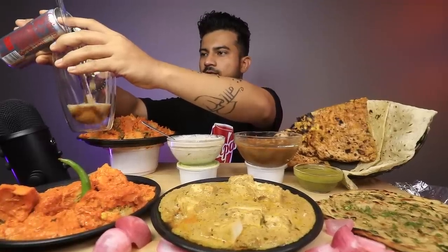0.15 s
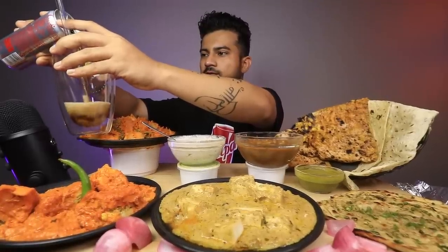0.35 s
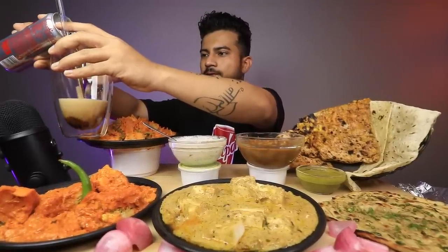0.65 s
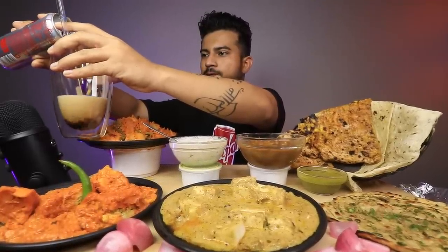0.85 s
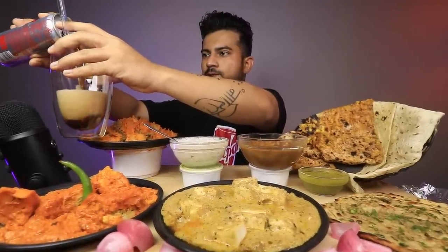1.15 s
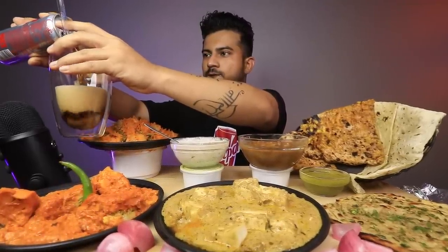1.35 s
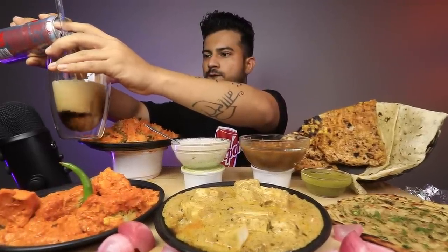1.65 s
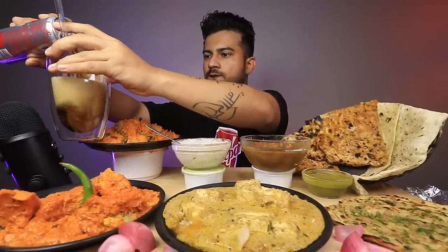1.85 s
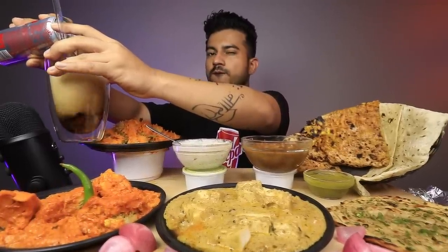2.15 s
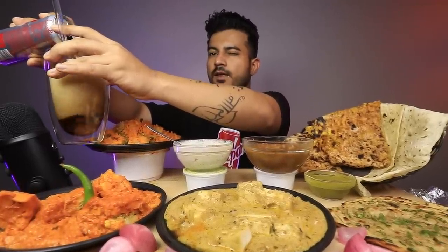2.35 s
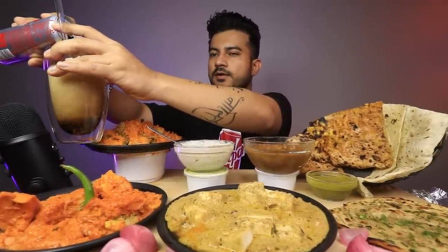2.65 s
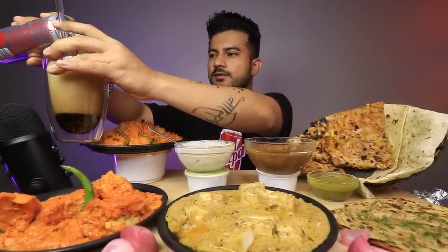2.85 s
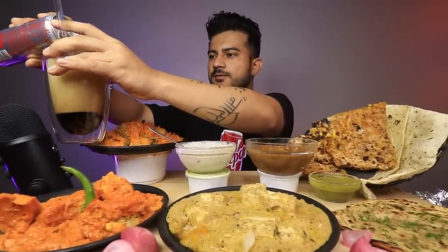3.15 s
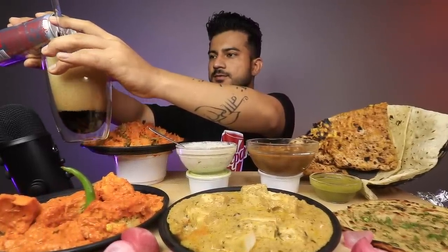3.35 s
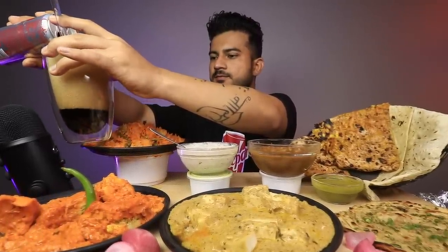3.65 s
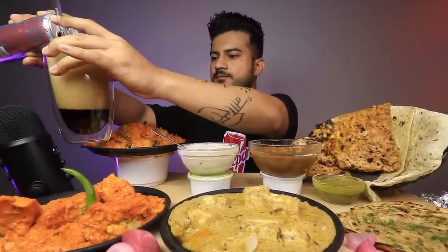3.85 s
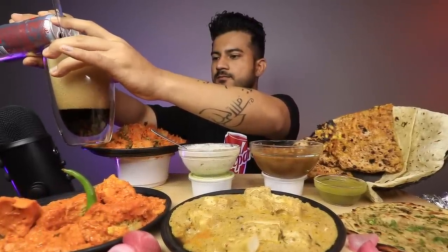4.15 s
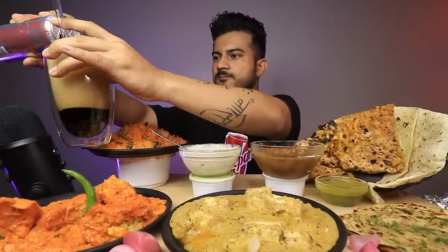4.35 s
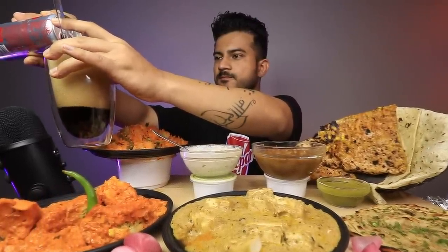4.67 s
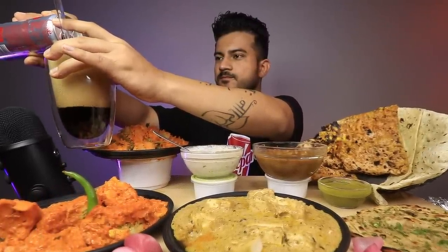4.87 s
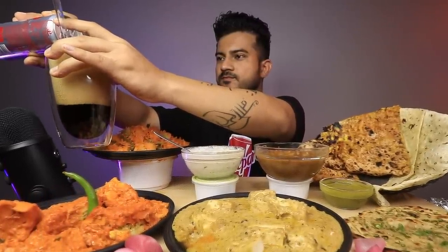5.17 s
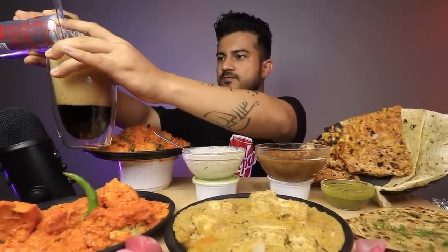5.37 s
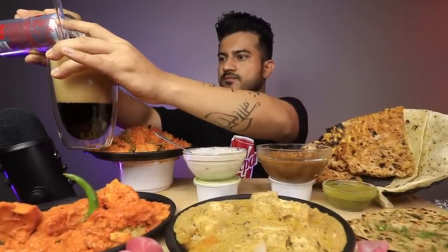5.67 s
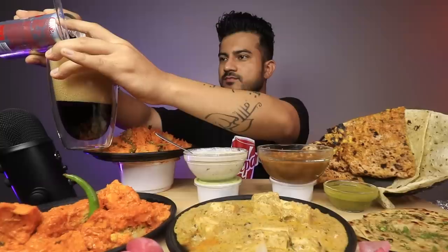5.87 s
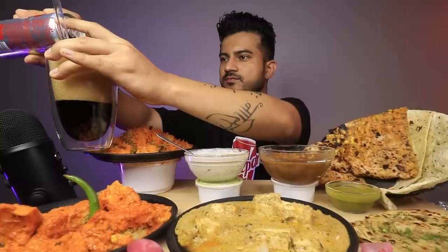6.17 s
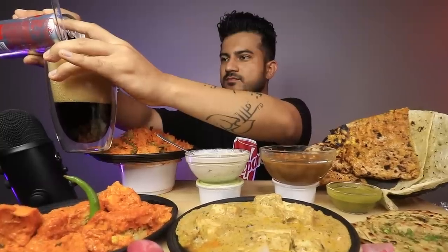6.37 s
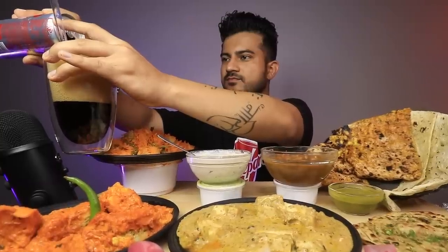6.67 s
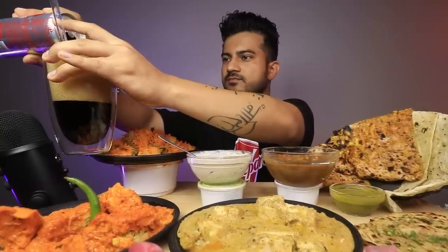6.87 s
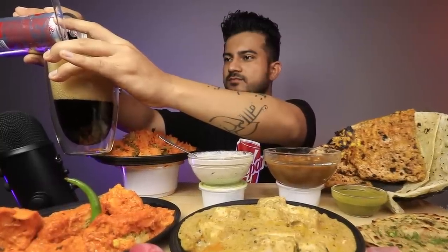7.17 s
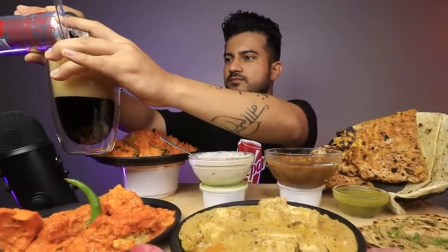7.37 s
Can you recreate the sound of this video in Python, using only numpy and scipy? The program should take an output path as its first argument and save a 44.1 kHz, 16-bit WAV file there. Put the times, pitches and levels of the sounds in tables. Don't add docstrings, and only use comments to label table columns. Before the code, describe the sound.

Soda splashes into an empty tall glass with hollow, low ringing glugs, then turns into a dense, steady fizz. Early on the thin can buckles with a sharp metallic crackle, then creases more softly. The airy tone within the hiss rises as the glass fills. Midway come small ticks and a low table bump; later a finger squeaks briefly on the can. Close microphone, indoor room, faint rumble.

```python
import sys
import numpy as np
from scipy import signal
from scipy.fft import rfft, irfft, next_fast_len
from scipy.io import wavfile
from scipy.ndimage import uniform_filter1d, map_coordinates

SR = 44100
rng = np.random.default_rng(int(sys.argv[2]) if len(sys.argv) > 2 else 0)


def transcribe(u):
    v = np.clip(np.atleast_2d(u).T, -1, 1)
    q = np.round(v * 32767).astype(np.int16)
    wavfile.write(sys.argv[1], SR, q)


def undo_db(level):
    steps = np.asarray(level, float) / 20
    return 10 ** steps


N = 331781
T = np.arange(N) / SR


def unit(x):
    return x / np.sqrt(np.mean(np.abs(x) ** 2) + 1e-20)


def along(points, hz):
    point_hz, value = np.transpose(points)
    return np.interp(np.log(hz + 1), np.log(point_hz + 1), value)


def wobble(knots_per_s):
    knots = rng.standard_normal(int(N * knots_per_s / SR) + 4)
    return map_coordinates(knots, [T * knots_per_s])


def bell(t, middle_s, takes_s):
    return np.exp(-((t - middle_s) / takes_s) ** 2)


def swells(rows):
    return sum(db * bell(T, middle_s, half_s) for middle_s, half_s, db in rows)


def peak(f, hz, width_hz):
    damping = 1j * f * width_hz
    return damping / (hz * hz - f * f + damping)


def filtered(x, response):
    m = next_fast_len(N + SR // 2)
    return irfft(rfft(x, m) * response(np.fft.rfftfreq(m, 1 / SR)), m)[:N]


def add(out, start_s, sound):
    part = out[round(start_s * SR):][:len(sound)]
    part += sound[:len(part)]


BUBBLE_HZ = [2500, 4500, 7500, 12500]


def bubbles():
    hiss = rng.standard_normal(N)
    for hz in BUBBLE_HZ:
        happens = rng.random(N) < 1500 / SR
        bursts = happens * rng.standard_normal(N) * undo_db(1.4 * rng.exponential(size=N))
        hiss = hiss + filtered(0.72 * unit(bursts), lambda f: peak(f, hz, 0.74 * hz))
    return hiss


# time_s, fizz_db, column_hz, column_over_fizz_db
POUR = [(0, -48, 686, 23.5), (.3, -45.5, 676, 15), (.6, -43, 740, 1.5), (1, -44, 825, 6),
        (1.5, -42.5, 970, 7.5), (2, -42.5, 1220, 8), (2.35, -41.5, 1340, 6.5), (2.7, -42.5, 1370, 9.5),
        (3.5, -42.5, 1390, 6.5), (4.5, -42, 1380, 4.5), (5.5, -41.5, 1430, 3), (6.7, -41, 1420, 3),
        (7.52, -42.5, 1400, 5)]
# pitch_hz, density_db_per_hz
THIN = [(150, -14), (400, -10.5), (1000, 2), (1900, -9), (3200, -7), (4400, -10), (6200, -6.5), (7800, -6),
        (9000, -12), (11000, -17), (13200, -16), (15500, -24)]
DEEP = [(150, -23.5), (400, -5), (1000, 0.5), (1900, -9), (3200, -3.5), (4400, -7), (6500, -4.5),
        (7800, -7.5), (9000, -12.5), (11000, -14), (13200, -18), (15500, -21)]
# pitch_hz, width_hz, level_db
THIN_HOLLOWS = [(2350, 150, -4), (2780, 300, 4.5), (3650, 180, -1)]
DEEP_HOLLOWS = [(547, 57, 2.5), (1927, 143, 2.5), (2344, 380, 1), (2610, 370, -3.5)]


def foam_surface(f, t, depth):
    lean, lift = bell(t, 1.8, .35), bell(t, 2.62, .33)
    lifted = lift - lean
    tired_s = np.clip(t - 4.8, 0, None)
    sparkle_db = 3.5 - 8 * bell(t, 0, 0.46) + 2 * lean + 0.5 * lift - 2 * tired_s
    body_db = (1 - depth) * along(THIN, f) + depth * along(DEEP, f)
    surface = undo_db(body_db + sparkle_db * np.abs(peak(f, 15200, 5100)))

    def bump_at(hz, width_hz):
        return np.abs(peak(f, hz, width_hz)) ** 2

    crest_db = 1.47 * bump_at(6200 + 1300 * lift, 4200)
    edge_db = (0.8 + 1.5 * lifted) * bump_at(9300 + 600 * lift, 2700)
    notch_db = (5.1 + 2 * lifted) * bump_at(11260 + 550 * lifted, 1640)
    return surface * undo_db(crest_db + edge_db - notch_db)


def foam():
    source = unit(bubbles()) * undo_db(.35 * wobble(9) + .5 * wobble(60))
    f, t, z = signal.stft(source, SR, nperseg=1024, noverlap=768)
    f = f[:, None] + 1
    time_s, *cols = np.transpose(POUR)
    fizz_db, column_hz, column_db = (np.interp(t, time_s, c) for c in cols)
    froth = np.exp(-t / 0.54)
    head = 0.97 / (1 + np.exp((2.6 - t) / 0.55))
    depth = np.clip(froth + head, 0, 1)
    core = np.abs(peak(f, column_hz, 100 + 0.13 * np.abs(column_hz - 720))) ** 4
    skirt = np.abs(peak(f, column_hz, .5 * column_hz)) ** 4
    column = core + undo_db(0.5) * skirt * np.clip(t / 1.3, 0, 1)
    power = foam_surface(f, t, depth) ** 2 + undo_db(column_db - 2) ** 2 * column
    for hollows, share in ((THIN_HOLLOWS, 1 - depth), (DEEP_HOLLOWS, depth)):
        power = power + share * sum(undo_db(db) ** 2 * np.abs(peak(f, hz, w)) ** 4 for hz, w, db in hollows)
    patches = uniform_filter1d(rng.standard_normal(z.shape), size=14, axis=0)
    patches = uniform_filter1d(patches, size=9, axis=1)
    z = z * np.sqrt(power) * undo_db(fizz_db + 6.5 + 0.14 * unit(patches))
    return signal.istft(z, SR, nperseg=1024, noverlap=768)[1][:N]


# start_s, peak_db, thud_over_ring_db
SPLASH = [(0, -11.5, -5), (0.0165, -23.5, -6), (.0235, -24.5, -12), (.029, -31, 4), (.0495, -33, 4),
          (.073, -36, -3), (.0905, -31, -6), (.0995, -28, -9), (.1325, -13.5, -4), (0.1557, -24.5, -4),
          (.159, -28, -2), (.1728, -30, 7), (0.1885, -25, 5), (.2175, -35, -5), (.2228, -18, 5),
          (.2375, -24.5, 4), (.2435, -29, -10), (0.2695, -28.5, 4), (.2858, -30, 0), (0.3283, -31, 0),
          (0.331, -41, 2), (0.7152, -33, 9), (0.7843, -28.5, 1), (1.161, -44, 15), (1.3, -35, 5),
          (1.381, -45, 23), (1.395, -41, 12)]
# pitch_hz, width_hz, level_db
EMPTY = [(310, 58, -5), (504, 190, -2.5), (584, 140, 1.5), (723, 50, 11.5), (800, 99, -16), (2900, 200, -7)]


def splashes():
    rings, thuds, slaps = np.zeros((3, N))
    for start_s, db, thud_db in SPLASH:
        add(rings, start_s, undo_db(db + 17.5) * np.hanning(57))
        add(thuds, start_s, undo_db(db + thud_db - 7.5) * np.hanning(41))
        add(slaps, start_s, undo_db(db + thud_db - 4) * np.hanning(13))
    air = filtered(rings, lambda f: sum(undo_db(db) * peak(f, hz, w) * w ** -.5 for hz, w, db in EMPTY))
    thud = filtered(thuds, lambda f: peak(f, 310, 550))
    slap = filtered(slaps, lambda f: peak(f, 1400, 1400))
    return air + thud + slap


def crackle(gain, modes, fill_db, blows=0):
    spikes = rng.standard_normal(N) * undo_db(2.6 * rng.standard_normal(N))

    def body(f):
        ringing = sum((-1) ** k * undo_db(db) * peak(f, hz, w) for k, (hz, w, db) in enumerate(modes))
        return ringing + undo_db(fill_db) * peak(f, 2400, 5400)

    return filtered(blows + gain * spikes, body)


def snaps(steps, modes, fill_db, blow_db, crackle_db):
    gain, blows = np.zeros(N), np.zeros(N)
    for start_s, snap_db, after_db, t60_s in steps:
        add(blows, start_s, undo_db([snap_db + blow_db]))
        add(gain, start_s, undo_db(after_db + crackle_db - 60 * T[:SR // 10] / t60_s))
    return crackle(gain, modes, fill_db, blows)


# start_s, snap_db, crackle_db, crackle_t60_s
BUCKLE = [
    (.4222, -5, -13, .05),
    (.42921, 1, -8, .025),
    (.43358, -4, -11, .03),
    (.43709, -5, -10, .025),
    (.4428, -12, -20, .015),
    (.4688, -30, -38, .02),
]
CREASE = [
    (.7682, -19, -27, .012),
    (.7693, -26, -27, .012),
    (.7715, -21, -27, .008),
    (.7765, -38, -42, .03),
]
# pitch_hz, width_hz, level_db
CAN_BODY = [(338, 55, -12.5), (500, 74, -20.5), (1050, 84, -9), (1930, 230, -15), (2375, 17, -1.5),
            (4450, 14, -4), (5020, 9.7, -13), (5830, 14, -19)]
CREASE_MODES = [(960, 190, -4.5), (1680, 190, 6), (1850, 250, 4), (2460, 120, -0.5), (3100, 300, -13),
                (3600, 200, -4), (4230, 110, 3.5), (5430, 140, -1), (5850, 91, 1.5), (6200, 170, -10),
                (7192, 200, -20)]
CAN_HZ = [3920, 4053, 4154, 4335, 4490, 4565, 4690, 4790, 5100, 5240, 5530, 5709, 5836, 5990, 6068, 6760,
          7160, 7870, 8512, 8960, 9900, 10189, 12970, 14400]
CAN_DB = [-7, -9, -6, -6.5, -6, 0.5, -7, -2.5, -9, -9, 0.5, 3.5, -13, -0.5, -6, -22, -9, -15, -13, -22, -19,
          -31, -30, -28]


def can_wall():
    wall = [(hz, 30 + 0.009 * hz, db) for hz, db in zip(CAN_HZ, CAN_DB)]
    buckle = snaps(BUCKLE, CAN_BODY + wall, fill_db=-23.5, blow_db=29.5, crackle_db=11.5)
    return buckle + snaps(CREASE, CREASE_MODES, fill_db=-30, blow_db=26.5, crackle_db=14.0)


def struck(modes, crack_db):
    t = T[:SR // 10]
    ring = sum(undo_db(db - 60 * t / t60_s) * np.sin(2 * np.pi * hz * t) for hz, db, t60_s in modes)
    rattle = 0.12 * undo_db(-60 * t / 0.0013) * rng.standard_normal(len(t))
    snap = [-.7, -.5, .8, .7, -.3]
    return ring + undo_db(crack_db) * np.convolve((t == 0) + rattle, snap)[:len(t)]


# pitch_hz, level_db, t60_s
GLASS_FLOOR = [(1580, -16, .006), (2870, -9, 0.016)]
TAB = [(1770, -9, .005), (2150, -6, .007), (2700, -8, .004), (3300, -8, .004), (4000, -8, .004),
       (5000, -8, .004), (6200, -10, .004)]
TABLE_TOP = [(300, -4, 0.0075), (800, -10, 0.0068), (1540, 1.5, 0.0078), (2040, -4, 0.0092),
             (2700, -3, .006)]
DENT = [(1500, 0.2, .014), (1820, 0.2, .013)]
RIM = [(6430, 5.5, 0.024), (6150, -7, .012), (5600, -14, .008)]
# start_s, peak_db, crack_db, modes
CLICKS = [(0.133, -33, -3, GLASS_FLOOR), (.1886, -43, -9, GLASS_FLOOR), (0.224, -26.5, -9, GLASS_FLOOR),
          (.7158, -28, -9, GLASS_FLOOR), (2.3246, -24, 4, TAB), (2.327, -31, -5, TAB),
          (2.4412, -24, -20, TABLE_TOP), (2.6748, -34, -8, DENT), (2.8182, -35, -8, DENT),
          (5.2895, -27.5, -20, DENT), (6.907, -26.5, -23, RIM)]


def clicks():
    out = np.zeros(N)
    for start_s, db, crack_db, modes in CLICKS:
        add(out, start_s, undo_db(db) * struck(modes, crack_db))
    return out


# start_s, slip_rate_hz, level_db, roughness_0_to_1
SQUEAK = [(5.133, 1061, -36, 0.4), (5.136, 1110, -45, 0.64), (5.1425, 1105, -49, 0.1),
          (5.149, 1050, -38.5, 0.5), (5.1559, 765, -41, 0.95), (5.17, 940, -43, .55),
          (5.1766, 1007, -40, 0.25), (5.1975, 957, -42.5, 0.1), (5.234, 974, -41.5, 0.1),
          (5.262, 983, -41.5, 0.3), (5.288, 1042, -40.5, 0.1)]
# pitch_hz, level_db
RUB = [(2300, -5), (2900, -5), (3900, -3), (4650, 4.5), (4850, -14), (5420, 7.5), (5800, -13), (6300, -12),
       (7000, -12), (8400, -14), (10500, -28)]
# pitch_hz, width_hz, level_db
SCRAPE_MODES = [(2250, 220, -4), (3880, 120, 5), (4590, 87, 2), (5200, 150, -3), (5570, 120, 0.5),
                (6900, 560, -7), (8300, 390, -9)]


def squeak():
    grip_s, lets_go_s = 0.0022, 5.2965
    start_s, *cols = np.transpose(SQUEAK)
    slip = np.clip(np.searchsorted(start_s, T) - 1, 0, None)

    def melt(x):
        return uniform_filter1d(x, max(1, round(grip_s * SR)))

    on = melt(1.0 * ((T > start_s[0]) & (T < lets_go_s)))
    hz, first_db, rough = (melt(c[slip]) for c in cols)
    phase = 2 * np.pi * np.cumsum(hz * (1 + 0.00833 * wobble(250))) / SR
    first = undo_db(first_db + 6.0) * np.sin(phase)
    second = undo_db(-38 + 6.0) * np.abs(peak(2 * hz, 1930, 100)) * np.sin(2 * phase)
    upper = sum(undo_db(along(RUB, k * hz)) * np.sin(k * phase + k * k) for k in range(3, 12))
    tone = first + second + undo_db(-46.5 + 11.5 * rough) * upper
    scrape = on * undo_db(-66 + 30 * rough + 18.5) * (1 + np.cos(phase))
    return on * tone * undo_db(1.3 * wobble(180)) + crackle(scrape, SCRAPE_MODES, fill_db=-23)


# pitch_hz, level_db, t60_s
TABLE = [(28.4, -28.5, 1.7), (68, -32, 0.32), (115, -36, 0.27)]


def bump():
    t = np.clip(T - 2.441, 0, None)
    onset = 1 - np.exp(-t / 0.012)
    return sum(undo_db(db - 60 * t / t60_s) * np.sin(2 * np.pi * hz * t) * onset for hz, db, t60_s in TABLE)


# pitch_hz, t60_s
ROOM = [(200, 0.23), (2000, 0.37), (5000, 0.31), (12000, 0.14)]


def walls(x):
    hz, t, z = signal.stft(rng.standard_normal(SR // 3), SR, nperseg=256)
    decay = undo_db(-60 * t / along(ROOM, hz)[:, None])
    tail = signal.istft(z * decay, SR, nperseg=256)[1]
    return signal.fftconvolve(np.pad(x, (300, 0)), tail / np.linalg.norm(tail))[:N]


# pitch_hz, density_db_per_hz
ROOM_TONE = [(11, -46), (18, -10), (38, 1.5), (60, -7.5), (92, -1.5), (118, -4.5), (192, -2.5), (271, -8.5),
             (500, -11.5), (650, -15), (1100, -120)]
# middle_s, half_length_s, rise_db
RUMBLE = [(0, .08, 12), (.6, 0.27, 4.5), (2.3, 0.67, 6.5), (3.2, 0.36, 1.5), (5.2, 0.29, 5.5),
          (7.15, .2, 5)]
HUM = [(0, 0.81, 2), (2.5, 0.12, 3.1), (6.6, 0.89, 4.1), (7.4, 0.16, 3.5)]


def room_tone():
    def rumble_colour(f):
        return undo_db(along(ROOM_TONE, f)) * (1 + 1.5 * np.abs(peak(f, 43.0, 3.3))) * (f < 70)

    rumble = unit(filtered(rng.standard_normal(N), rumble_colour))
    hum = unit(filtered(rng.standard_normal(N), lambda f: undo_db(along(ROOM_TONE, f)) * (f >= 70)))
    rumble_db = -60.5 + swells(RUMBLE) + .6 * wobble(3)
    hum_db = -57 + swells(HUM) + .9 * wobble(4.4)
    return undo_db(rumble_db) * rumble + undo_db(hum_db) * hum


# middle_s, half_length_s, rise_db
DRONE = [(0, .08, 17), (.45, 0.081, 4.2), (1.05, 0.066, 10), (1.36, 0.16, 10.6), (2.5, .17, 8),
         (2.95, 0.072, 13), (3.6, 0.27, 6.3), (4.17, 0.23, 13.4), (4.69, 0.062, 16), (4.96, 0.047, 17),
         (6.15, 0.34, 11.5)]


def drone():
    line = filtered(rng.standard_normal(N), lambda f: peak(f, 89.0, 8.4) ** 2)
    return undo_db(-69.5 + swells(DRONE)) * unit(line)


def scene():
    near = splashes() + can_wall() + clicks() + squeak()
    background = room_tone() + drone()
    return (near + undo_db(-22.5) * walls(near) + foam() + bump() + background)[None]


def low_pass(x):
    return signal.sosfilt(signal.butter(12, 15880, fs=SR, output="sos"), x)


def record(dry):
    clipped = np.clip(dry[0], -1, 1)
    mix = filtered(clipped, lambda f: f < 15820)[None]
    return low_pass(mix)


dry = scene()
out = record(dry)
transcribe(out)
```